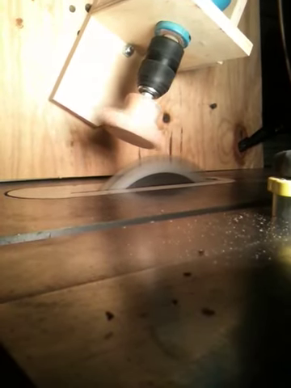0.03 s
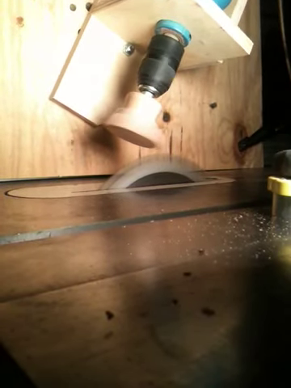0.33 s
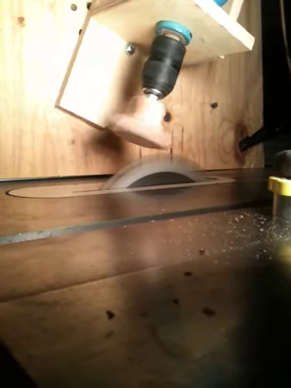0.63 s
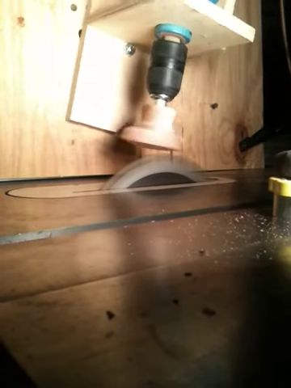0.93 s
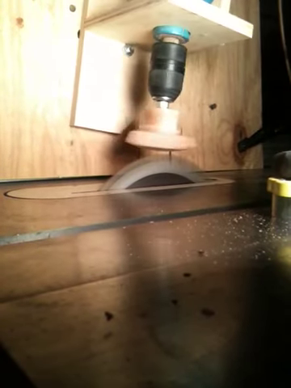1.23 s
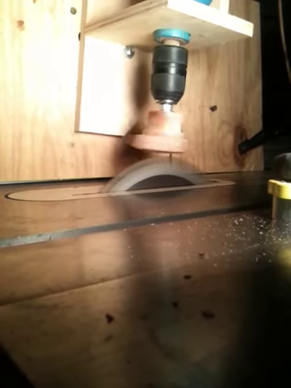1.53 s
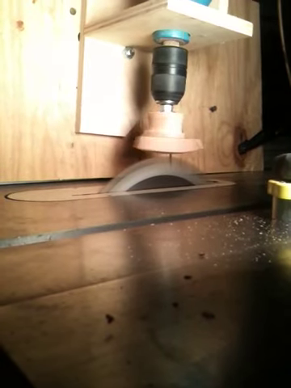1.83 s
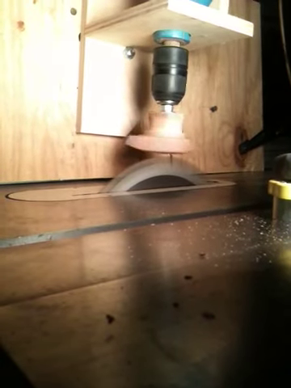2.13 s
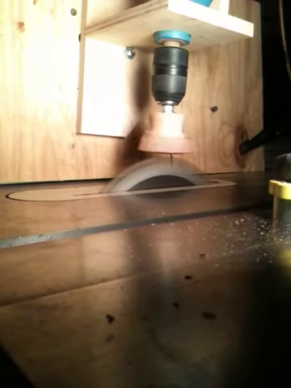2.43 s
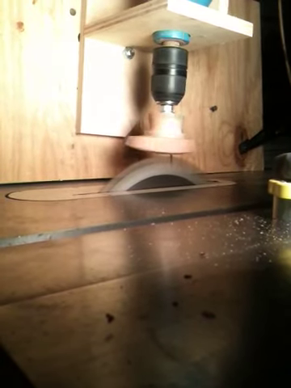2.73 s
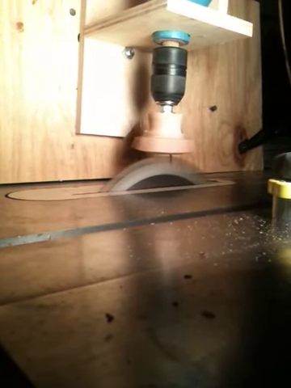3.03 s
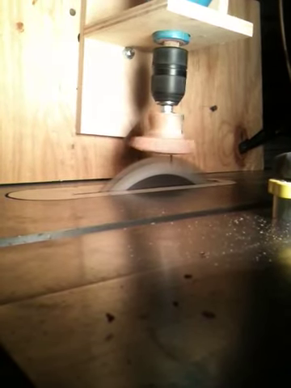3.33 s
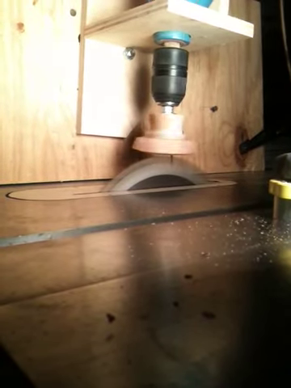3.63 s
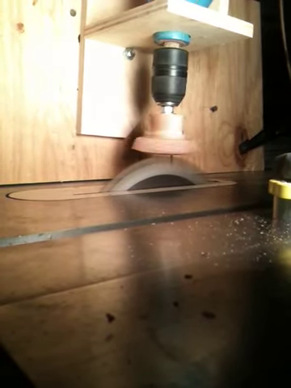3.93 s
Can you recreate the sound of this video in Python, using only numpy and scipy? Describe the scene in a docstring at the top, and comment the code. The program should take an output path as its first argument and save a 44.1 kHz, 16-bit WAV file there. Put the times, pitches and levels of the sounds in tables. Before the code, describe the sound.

A table saw runs steadily with a roaring whine, briefly grazing wood near the end.

```python
"""A workshop, close to the table of a free-running, belt-driven table saw.
The blade whines over a roar of churned air, and the belt repeats the same fizz on every turn.
A small motor hums while it swings a drill upright; near the end the drill turns a wooden disc
that grazes the teeth and makes the blade ring."""
import sys
import numpy as np
from scipy import signal
from scipy.fft import rfft, irfft
from scipy.io import wavfile
from scipy.ndimage import uniform_filter1d

SR = 44100
rng = np.random.default_rng(int(sys.argv[2]) if len(sys.argv) > 2 else 0)


def file_out(sig):
    """Save sig as 16-bit WAV at sys.argv[1]."""
    # one column per channel
    cols = np.atleast_2d(sig).T
    # limit, then scale
    lim = np.clip(cols, -1, 1)
    pcm = np.round(lim * 32767).astype(np.int16)
    wavfile.write(sys.argv[1], SR, pcm)


N = 176400
T = np.arange(N) / SR
HZ = np.fft.rfftfreq(N, 1 / SR)
BELT_TURN_S = .09957


def amp(db):
    """dB to gain."""
    return 10 ** (np.asarray(db) / 20)


def unit(x):
    """Scale to rms 1."""
    return x / np.sqrt(np.mean(x ** 2) + 1e-20)


def log_interp(rows, x):
    """Two-column table read at x on a log axis."""
    knots, db = np.transpose(rows)
    return np.interp(np.log(x + 1), np.log(knots + 1), db)


def curve(rows, column=1):
    """One column of a time table, per sample."""
    rows = np.array(rows)
    return np.interp(T, rows[:, 0], rows[:, column])


def bell(hz, width_hz):
    """Gaussian spectral peak, height 1."""
    return .5 ** ((2 * (HZ - hz) / width_hz) ** 2)


def response(spectrum, resonances):
    """Gain per bin: broad spectrum plus resonances."""
    lift_db = sum(db * bell(hz, width_hz) for hz, width_hz, db in resonances)
    return amp(log_interp(spectrum, HZ) + lift_db)


def colour(x, gain):
    """Filter by a gain per bin; rms 1."""
    return unit(irfft(rfft(x) * gain, N))


def noise(gain):
    """Shaped noise, rms 1."""
    return colour(rng.standard_normal(N), gain)


def wander(hz):
    """Smooth random motion up to about hz; rms 1."""
    return noise(np.exp(-(HZ / hz) ** 2))


def gate(start_s, end_s, fade_s):
    """Trapezoid envelope."""
    return np.clip(np.minimum(T - start_s, end_s - T) / fade_s, 0, 1)


def sine(hz, phase_rad=0):
    """Tone of random start phase, rms 1."""
    return np.sqrt(2) * np.sin(2 * np.pi * (hz * T + rng.random()) + phase_rad)


# start/s, end/s, fade/s, f/Hz, level/dB
HUMS = [(-.2, 2.27, 0.17, 120.9, -51), (2.1, 4.7, 0.42, 143.4, -59)]


def drill_rig():
    """A motor hums as it swings the drill; a fainter hum follows once it is upright."""
    return sum(amp(db) * gate(start, end, fade) * sine(hz) for start, end, fade, hz, db in HUMS)


# Drive tones, one list each: f/Hz, level/dB, rms flutter/dB
DRIVE_HZ = [80.3, 100.4, 149.5, 186, 299, 430, 538, 2319.4, 4171, 5035, 5171.6, 5763.9]
DRIVE_DB = [-82, -76, -54, -62.5, -63, -64.5, -52.4, -53, -49, -61, -54, -54.5]
DRIVE_FLUTTER_DB = [1, 1, 1.7, 2.3, 2.4, 2, .7, 2, 1.8, 2, 1.7, 2]


def drive():
    """Unsteady tones of the saw's motor, pulleys and bearings."""
    out = np.zeros(N)
    for hz, db, flutter_db in zip(DRIVE_HZ, DRIVE_DB, DRIVE_FLUTTER_DB):
        gain = amp(db + flutter_db * wander(23))
        out += gain * sine(hz, phase_rad=.075 * flutter_db * wander(6.3))
    return out


# t/s, mean level/dB
PULLEY_LEVEL = [(0, -51), (1.3, -49.5), (2.3, -49), (2.9, -54.5), (4, -54.5)]


def pulley(hz=964.1, swell_db=4):
    """A tone pulses with the belt's tension, once per turn."""
    tension = np.cos(2 * np.pi * T / BELT_TURN_S)
    return amp(curve(PULLEY_LEVEL) + swell_db * tension) * sine(hz)


# t in turn/s, peak level/dB
SQUEAKS = [(.030, -40), (.039, -37.5), (.064, -45.5)]


def belt_squeaks(hz=12040, half_width_s=.0014, glide_hz_per_s=60000):
    """The same spots of the belt slip on every turn, each with a short rising chirp."""
    out = np.zeros(N)
    for at_s, db in SQUEAKS:
        t = T % BELT_TURN_S - at_s
        envelope = amp(db + 2 * wander(8)) * np.exp(-(t / half_width_s) ** 2)
        chirp_rad = np.pi * glide_hz_per_s * t ** 2
        out += envelope * sine(hz, chirp_rad + 2 * wander(6.3))
    return out


# t in turn/s, relative level/dB
BELT_RUB = [(.008, -5.5), (.022, 5), (.039, 4), (.05, -.5), (.07, 5), (.081, 4), (0.095, 0.5)]
# f/Hz, relative density/dB
FIZZ_SPECTRUM = [(1000, -22), (4500, -1), (5700, 3), (7500, -9), (9300, -10), (9700, -23), (10000, 2.5),
                 (10300, -2), (10500, -12), (11100, -29), (11450, 4.5), (12200, -1), (12900, -12),
                 (13150, 4.5), (13600, -1), (14000, 1), (14600, -9), (15600, -25)]
# Resonances excited by the rub: f/Hz, width/Hz, lift/dB
BELT_RINGS = [(10001, 45, 6.5), (10270, 45, 6), (11480, 50, 4), (11870, 90, 7), (12240, 60, 8),
              (13145, 55, 8.5), (13420, 55, 9), (13590, 70, 7.5)]


def belt_fizz(level_db=-37, drift_hz=1.36, textures=4):
    """The same stretches of belt rub the pulleys on every turn; the contact drifts slowly."""
    turn_samples = round(BELT_TURN_S * SR)
    shares = np.array([wander(drift_hz) for _ in range(textures)])
    shares /= np.linalg.norm(shares, axis=0)  # constant power
    grain = sum(share * np.resize(rng.standard_normal(turn_samples), N) for share in shares)
    at_s, rub_db = np.transpose(BELT_RUB)
    rub = amp(np.interp(T, at_s, rub_db, period=BELT_TURN_S))
    return amp(level_db) * colour(grain * rub, response(FIZZ_SPECTRUM, BELT_RINGS))


# Disc contacts: start/s, length/s, gain/dB
GRAZES = [(3.595, .11, 1), (3.675, .08, -4), (3.735, .09, 1.5), (3.8, .095, -5), (3.95, .11, 1)]
# Tooth-rate overtone, then blade rings: f/Hz, half-width/Hz, level at unit contact/dB
GRAZE_TONES = [(6363, 40, -53), (7560, 110, -51), (7779, 30, -49), (7919, 16, -42.5), (8430, 70, -47.5),
               (8800, 70, -53), (10627, 25, -54), (11310, 25, -50)]


def disc_graze(fade_s=.025, scrape_db=-45):
    """Teeth scrape the disc; a tooth-rate overtone sings and the blade rings."""
    touches = [amp(db) * gate(start, start + length, fade_s) for start, length, db in GRAZES]
    contact = np.max(touches, axis=0)
    tones = sum(amp(db) * noise(1 / (1 + ((HZ - hz) / half_width_hz) ** 2))
                for hz, half_width_hz, db in GRAZE_TONES)
    scrape = amp(scrape_db) * noise(bell(7500, width_hz=2600))
    return contact * (tones + scrape)


# f/Hz, relative density/dB
AIR_SPECTRUM = [(20, -40), (50, -35), (75, -35), (97, -17), (135, -5.5), (175, -12.5), (270, -4.5),
                (500, -6.5), (660, -4.5), (920, -3.5), (1300, -0.5), (2000, 1), (3200, 6.5), (4600, 2),
                (5200, -3.5), (5900, -4.5), (7300, -7.5), (9000, -14), (11000, -20.5), (13000, -10.5),
                (15500, -26)]
# Blade slot and cabinet: f/Hz, width/Hz, lift/dB
CAVITY_MODES = [(217, 35, 7), (260, 9.8, 4), (447, 23, 4.5), (580, 40, 3), (748, 28, 7), (840, 33, 4.5),
                (2338, 35, 7), (2740, 91, 5), (2830, 41, -2.5), (3190, 83, 4.5), (3424, 117, 4.5),
                (3628, 286, 9), (3844, 232, 6), (4140, 84, 7.5), (4360, 225, 5.5)]
# t/s, level before trim/dB
ROAR_LEVEL = [(0, -25), (2.18, -25), (3.56, -25), (3.74, -24.5), (4, -25)]
# Rasp band over the roar: t/s, lift/dB
RASP_LIFT = [(0, 1), (.65, 2), (1.1, 1.1), (1.6, -.3), (2.7, -.6), (3.2, .4), (4, .2)]


def air_roar(trim_db=.23, eddy_db=.2, flutter_db=.9):
    """Small eddies off the blade ring in slot and cabinet; a rasping band flutters."""
    cells = signal.stft(rng.standard_normal(N), nperseg=512, noverlap=384)[2]
    patches = uniform_filter1d(rng.standard_normal(cells.shape), size=10, axis=1)  # along time
    patches = unit(uniform_filter1d(patches, size=7, axis=0))  # along frequency
    eddies = signal.istft(cells * amp(eddy_db * patches), nperseg=512, noverlap=384)[1][:N]
    air = colour(eddies, response(AIR_SPECTRUM, CAVITY_MODES))
    rasp = irfft(rfft(air) * bell(3700, width_hz=480), N)
    flutter = noise(bell(22, width_hz=22))
    rasp_gain = amp(curve(RASP_LIFT) + flutter_db * flutter)
    return amp(curve(ROAR_LEVEL) + trim_db) * (air + rasp * (rasp_gain - 1))


# t/s, then level/dB of harmonics 1, 2, 3
WHINE_LOW = [(0, -39.2, -33.8, -39.3), (.35, -39.4, -33.7, -39.8), (.7, -39.4, -35.5, -40.3),
             (1.05, -41, -34.6, -39.6), (1.55, -42.8, -38.4, -37.8), (2.2, -44.6, -38.5, -39),
             (2.9, -45.2, -39.1, -38.6), (4, -45, -39.4, -38.7)]
# harmonic, level/dB
WHINE_HIGH = [(4, -50), (5, -49), (6, -48), (7, -50), (12, -59)]
# harmonic, rms flutter/dB; last row holds for higher ones
WHINE_FLUTTER = [(1, 2.2), (2, .8), (3, 1.6)]
# Teeth bite into the disc: start/s, end/s, gain/dB
BITES = [(3.62, 3.81, 0), (3.96, 4.0, -4)]
# Tooth strikes: harmonic, level at unit bite/dB
STRIKES = [(3, -44), (6, -34)]


def blade_whine(hz=707.3, flutter_hz=32, bite_rise_s=.04, bite_decay_s=.12):
    """Harmonics of one shaft flutter in the draught; teeth striking wood boost and roughen two."""
    shaft_jitter_rad = .05 * wander(flutter_hz)
    bite = np.zeros(N)
    for start_s, end_s, db in BITES:
        rise = np.clip((T - start_s) / bite_rise_s, 0, 1)
        decay = np.exp(-np.maximum(T - end_s, 0) / bite_decay_s)
        bite += amp(db) * rise * decay
    harmonics = [(k, curve(WHINE_LOW, column=k)) for k in (1, 2, 3)] + WHINE_HIGH
    strike_db = dict(STRIKES)
    out = np.zeros(N)
    for k, db in harmonics:
        gain = amp(db + log_interp(WHINE_FLUTTER, k) * wander(flutter_hz))
        phase_rad = k * shaft_jitter_rad
        if k in strike_db:
            gain += bite * amp(strike_db[k] + 2 * wander(55))
            phase_rad += bite * .35 * wander(60)
        out += gain * sine(k * hz, phase_rad)
    return out


def scene():
    """Saw and drill rig, the same in both channels."""
    mono = (blade_whine() + drive() + drill_rig() + air_roar()
            + belt_fizz() + belt_squeaks() + pulley() + disc_graze())
    return np.array([mono, mono])


def record(dry):
    """Steep low-pass."""
    cutoff_hz = 15650
    lowpass = signal.firwin(511, cutoff_hz, window=("kaiser", 9), fs=SR)
    return signal.oaconvolve(dry, lowpass[None], "same")


dry = scene()
out = record(dry)
file_out(out)
```